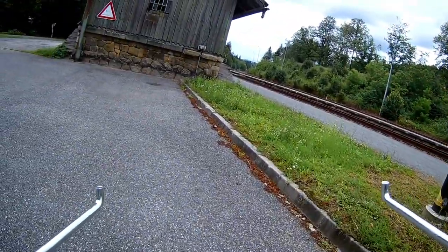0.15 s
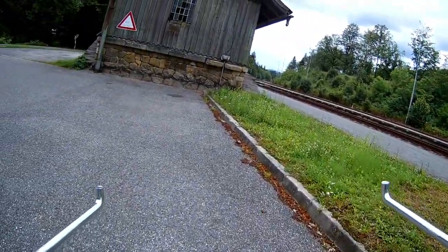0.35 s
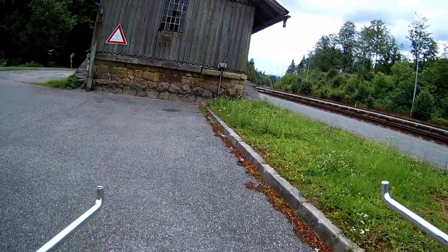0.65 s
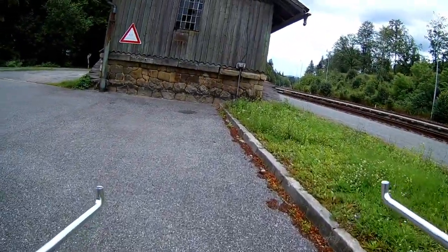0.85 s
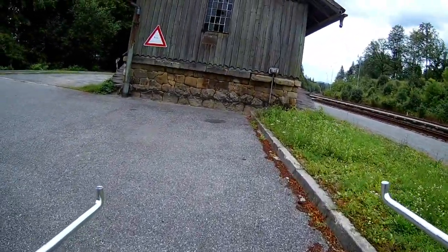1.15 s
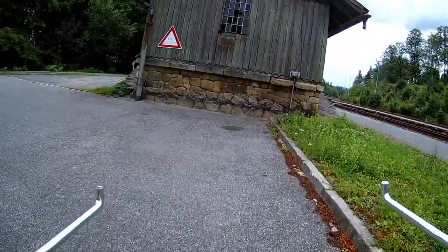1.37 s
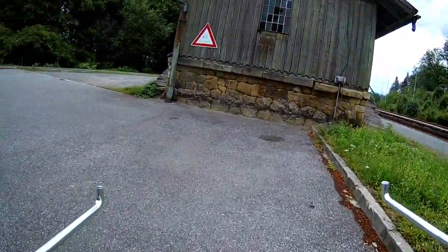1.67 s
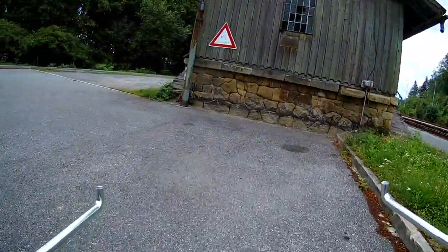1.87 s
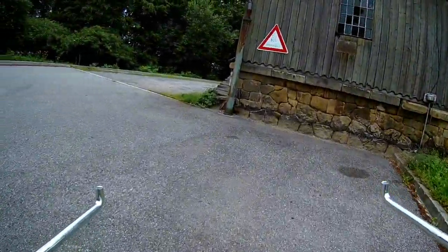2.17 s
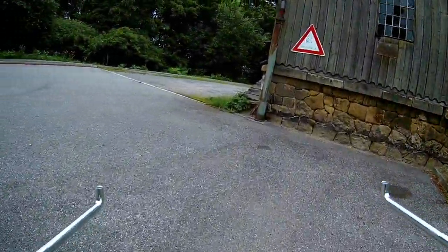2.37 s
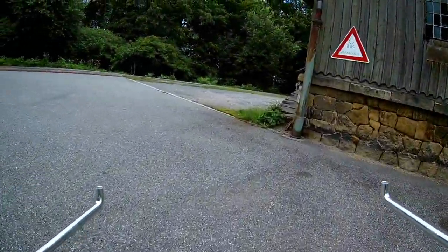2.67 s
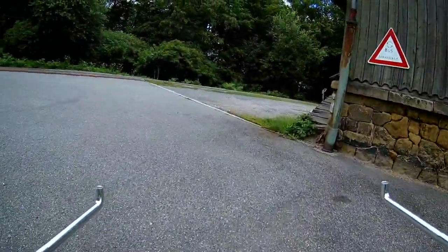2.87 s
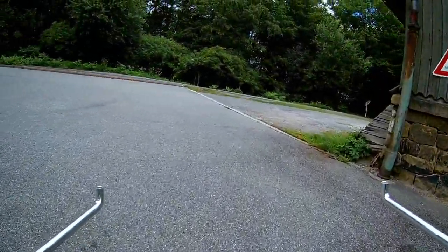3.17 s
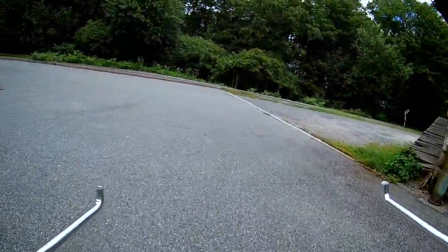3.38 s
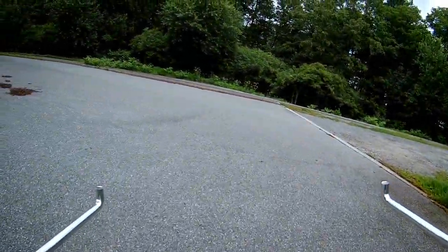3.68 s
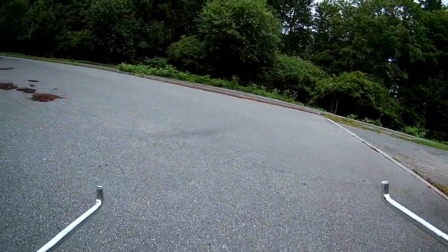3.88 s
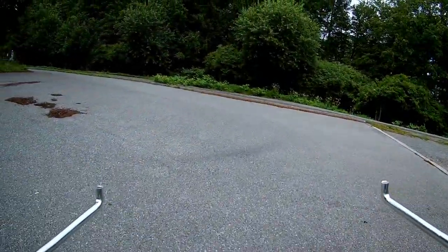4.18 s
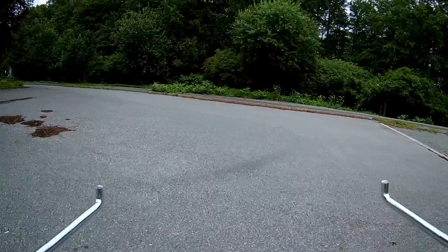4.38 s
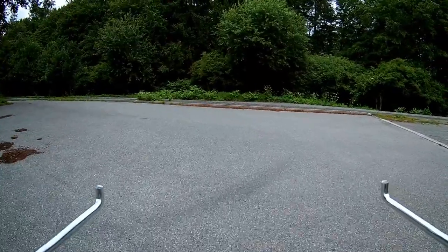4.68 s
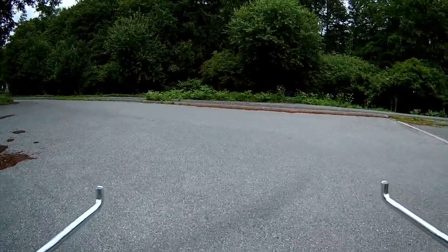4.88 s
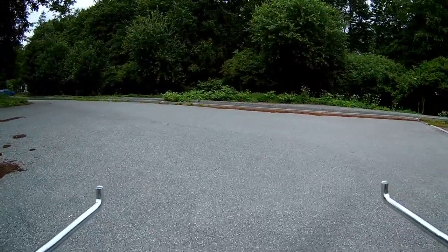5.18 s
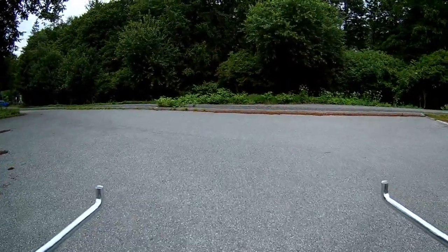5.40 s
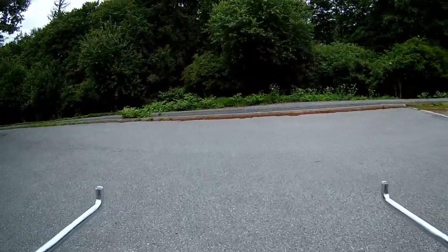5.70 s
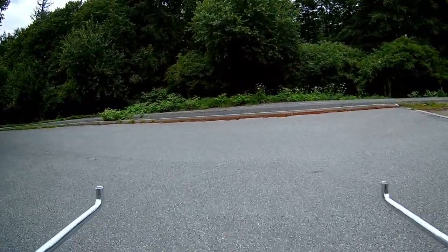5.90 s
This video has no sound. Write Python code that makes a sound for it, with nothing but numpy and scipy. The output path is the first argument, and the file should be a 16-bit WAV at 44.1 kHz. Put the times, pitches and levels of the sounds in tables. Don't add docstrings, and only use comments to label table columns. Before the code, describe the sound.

A microphone fixed to a bicycle frame near the fork picks up a ride across coarse open asphalt. Tyre boom, frame buzz and faint tread hiss run throughout. Loose fittings rattle around a hard knock at the start, then thin out. Grit snaps under the tyre, low wind thumps swell, and after about two seconds the chain ticks softly and regularly as pedalling settles.

```python
import sys
import numpy as np
from scipy import signal
from scipy.fft import rfft, irfft
from scipy.io import wavfile

SR = 44100
rng = np.random.default_rng(int(sys.argv[2]) if len(sys.argv) > 2 else 0)


def attenuation_scalar(level_db):
    decades = np.asarray(level_db, float) / 20
    return 10 ** decades


def file_out(sig):
    cols = np.atleast_2d(sig).T
    lim = np.clip(cols, -1, 1)
    pcm = np.round(lim * 32767).astype(np.int16)
    wavfile.write(sys.argv[1], SR, pcm)


N = 266805


def table(rows):
    return np.transpose(np.array(rows, float))


def control(rows):
    s, level_db = table(rows)
    return np.interp(np.arange(N) / SR, s, level_db)


def rms_one(x):
    return x / np.sqrt(np.mean(x ** 2) + 1e-20)


# f/Hz, width/Hz, level above the rest/dB
HOUSING_RESONANCES = [(439.5, 42, 5.5), (791, 98, 4), (1324, 150, 2.5), (1676, 350, 4), (2110, 110, 3),
                      (3360, 60, 1.5), (3860, 120, 0.5)]


def coloured(spectrum, white, ringing=False):
    hz = np.maximum(np.fft.rfftfreq(N, 1 / SR), 1)
    at_hz, level_db = table(spectrum)
    octaves_below = np.maximum(np.log2(at_hz[0] / hz), 0)
    octaves_above = np.maximum(np.log2(hz / at_hz[-1]), 0)
    curve_db = np.interp(np.log(hz), np.log(at_hz), level_db)
    gain = attenuation_scalar(curve_db - 44 * (octaves_below + octaves_above))
    if ringing:
        for centre_hz, width_hz, peak_db in HOUSING_RESONANCES:
            gain = gain * attenuation_scalar(peak_db / (1 + (2 * (hz - centre_hz) / width_hz) ** 2))
    return rms_one(irfft(rfft(white) * gain, N))


def drift(rate_hz):
    hop = 40
    settling = 2000
    r = np.exp(-2 * hop * np.pi * rate_hz / SR)
    white = rng.standard_normal(N // hop + settling + 2)
    slow = signal.lfilter([1], [1, -2 * r, r * r], white)[settling:]
    return np.interp(np.arange(N) / hop, np.arange(len(slow)), rms_one(slow))


def gritty(grains_per_s, spread_db, share):
    even = rng.standard_normal(N)
    born = rng.random(N) < grains_per_s / SR
    size = np.minimum(rng.exponential(1, N), 4)
    stones = born * attenuation_scalar(spread_db * size) * np.sign(even)
    return even + share * rms_one(stones)


# t/s, level/dB
GUSTS = [(0.0, -54), (0.27, -52.5), (0.4, -58), (0.94, -51), (1.45, -39.5), (1.62, -45), (1.77, -35.5),
         (1.95, -31), (2.09, -48), (2.21, -38), (2.35, -48), (2.6, -38), (2.75, -46), (3.0, -37.5),
         (3.55, -39), (4.3, -47.5), (5.4, -47), (5.75, -36.5)]
# f/Hz, level per Hz/dB
SWAY_SPECTRUM = [(11, -33), (18, -17.5), (38, 5), (70, -7.5), (90, -9), (120, -20), (200, -120)]


def wind_and_sway(boom_swell_db):
    level_db = control(GUSTS) - 1.3 + 0.05 * boom_swell_db
    return attenuation_scalar(level_db) * coloured(SWAY_SPECTRUM, rng.standard_normal(N))


# t/s, level/dB
BOOM_CURVE = [(0.0, -43.5), (0.45, -46), (0.83, -40.5), (0.94, -44), (1.55, -39), (1.77, -35), (1.95, -37),
              (2.07, -42), (2.13, -35), (2.4, -39), (2.61, -35), (2.8, -37), (4.11, -39), (4.5, -37.5),
              (4.58, -44), (4.75, -40.5), (5.68, -37.5), (5.8, -36.5)]
# f/Hz, level per Hz/dB
BOOM_SPECTRUM = [(41, -32), (70, -10.5), (97, -1), (113, 3.5), (145, -7.5), (214, -5.5), (253, -13),
                 (320, -19), (420, -47), (700, -120)]


def tyre_boom(boom_db):
    level_db = boom_db + 0.28 + 0.6 * drift(5.9)
    return attenuation_scalar(level_db) * coloured(BOOM_SPECTRUM, rng.standard_normal(N))


# t/s, level/dB
PACE_CURVE = [
    (0.0, -53.5),
    (0.22, -52),
    (1.14, -51),
    (1.65, -49),
    (3.69, -48.5),
    (4.87, -50.5),
    (5.56, -48.5),
    (6.05, -51),
]
# f/Hz, level per Hz/dB
BUZZ_SPECTRUM = [(160, -27.5), (270, -2), (371, -6.5), (654, -8), (781, -8.5), (1260, -13.5), (1930, -24),
                 (2110, -26), (2500, -36.5), (3250, -66), (5500, -120)]


def frame_buzz(boom_swell_db, unevenness):
    level_db = control(PACE_CURVE) - 0.07 + 0.13 * boom_swell_db + unevenness
    road = gritty(grains_per_s=300, spread_db=3.1, share=0.47)
    return attenuation_scalar(level_db) * coloured(BUZZ_SPECTRUM, road, ringing=True)


# t/s, level/dB
GRIT_CURVE = [
    (0, -73),
    (1.0, -73.5),
    (1.5, -71),
    (2.4, -72.5),
    (2.8, -70.5),
    (3.4, -70.5),
    (3.9, -72.5),
    (4.7, -75.5),
    (6.05, -75),
]
# f/Hz, level per Hz/dB
HISS_SPECTRUM = [(1350, -27), (2300, -2), (2670, -3.5), (3110, -3), (3810, -3), (4140, -4.5), (5890, -14.5),
                 (7500, -30.5), (9750, -55), (16500, -120)]


def tread_hiss(unevenness):
    level_db = control(GRIT_CURVE) - 0.13 + 1.3 * unevenness
    road = gritty(grains_per_s=400, spread_db=4.3, share=0.67)
    return attenuation_scalar(level_db) * coloured(HISS_SPECTRUM, road, ringing=True)


def rolling():
    boom_db = control(BOOM_CURVE)
    boom_swell_db = boom_db - boom_db.mean()
    unevenness = drift(21)
    low = wind_and_sway(boom_swell_db) + tyre_boom(boom_db)
    return low + frame_buzz(boom_swell_db, unevenness) + tread_hiss(unevenness)


def struck(times, ring_db, modes, contact_s, detune, scatter_db):
    hz, mode_db, t60, ring = table(modes)[:, :, None]
    t = np.arange(2400) / SR
    member = np.round(ring.T) == np.arange(ring_db.shape[1])[:, None]
    chance = rng.standard_normal((len(times), 2, len(hz), 1))
    push = (t / contact_s) ** 2 * np.exp(-t / contact_s)
    chatter = rng.standard_normal((len(times), 1, len(t))) * push
    spans_hz = [(0.53 * hz[own].min(), 1.186 * hz[own].max()) for own in member]
    padding = [signal.butter(3, span, "band", fs=SR, output="sos") for span in spans_hz]
    out = np.zeros(N + len(t))
    for s, level_db, (pitch, size), force in zip(times, ring_db, chance, chatter):
        tones = attenuation_scalar(-60 * t / t60) * np.sin(2 * np.pi * hz * (1 + detune * pitch) * t)
        tones = signal.fftconvolve(tones, force, axes=1)[:, :len(t)]
        tones *= attenuation_scalar(mode_db + scatter_db * size) / np.abs(tones).max(axis=1, keepdims=True)
        rings = np.array([signal.sosfilt(pad, one) for pad, one in zip(padding, member @ tones)])
        start = max(round((s - 1.8 * contact_s) * SR), 0)
        out[start:start + len(t)] += (attenuation_scalar(level_db) / np.abs(rings).max(axis=1)) @ rings
    return out[:N]


# f/Hz, level/dB, t60/s, ring
MOUNT_MODES = [(774, 6, 0.023, 0), (851, -10.5, 0.05, 0), (329, -3.5, 0.027, 1), (431, -0.5, 0.025, 1.5),
               (594, -3.5, 0.016, 2), (656, 7, 0.042, 2), (1277, 1, 0.027, 3), (1360, -11.5, 0.034, 5),
               (1560, -7, .012, 4.5), (1710, 1, .025, 4.5), (2044, 3, 0.04, 4), (2165, -6, 0.031, 4),
               (2640, -17, 0.0072, 3), (3010, -10.5, 0.02, 3.5), (3400, -17, .015, 5.5),
               (3833, -10.5, 0.03, 3.5), (4500, -24, .008, 5.5), (5200, -24, .015, 4.5)]


def knocks(rows, shape_db, clamp_sharpens, contact_s):
    s, level_db, hollow_db, sharp_db = table(rows)
    tilt_db = np.transpose([0 * s, hollow_db, hollow_db, clamp_sharpens * sharp_db, sharp_db])
    rings_db = tilt_db + level_db[:, None] + shape_db
    return struck(s, rings_db, MOUNT_MODES, contact_s, detune=0.02, scatter_db=2.5)


# t/s, clamp ring level/dB, hollowness/dB, sharpness/dB
RATTLE_BLOWS = [(0.023, -40, -17, 0), (0.082, -39.5, -11, 1.5), (0.121, -37, -3, -4), (0.13, -38, -8, -5),
                (0.14, -44.5, -7, 1), (0.163, -39.5, -11, 0.5), (0.208, -41, -13, 1), (0.221, -51, -7, 5),
                (0.266, -44.5, -10, -0.5), (0.283, -51, -10, 2), (0.59, -46.5, -9, -3.5),
                (1.027, -44.5, 1, -13), (2.689, -48, -3, -8), (2.782, -48.5, -6, 6), (3.33, -41, -4, -8),
                (3.406, -37.5, -12, -16), (3.619, -46, 1, -6), (3.722, -40, 7, -7), (3.824, -41.5, -12, 3)]
RATTLE_SHAPE = [
    0,
    0,
    -6,
    4,
    -5,
]


def rattles():
    return knocks(RATTLE_BLOWS, RATTLE_SHAPE, clamp_sharpens=0.05, contact_s=0.00141)


# t/s, body ring level/dB, hollowness/dB, sharpness/dB
BUMP_BLOWS = [(0.112, -23.5, -2, 0), (0.396, -38, -8, 7), (0.474, -41.5, 1, -5), (0.569, -47, -2, 0),
              (0.696, -50, -1, 5), (0.744, -40.5, 8.5, -3), (1.307, -48, -4, -1), (1.319, -32.5, -3.5, -7),
              (1.372, -40.5, 3, -2), (1.591, -43, 3, 7), (1.665, -43.5, 2, 5), (1.709, -39.5, 2, 3.5),
              (1.754, -41.5, 0, 4), (1.904, -40, 4, 5.5), (1.926, -38.5, -1, 0), (1.953, -44, -5, 2),
              (2.951, -44, 0, -2), (2.991, -43, -4, 0), (3.091, -43, 2, 1), (3.16, -40, 0, -5),
              (3.255, -36, -14, 1.5), (3.901, -40.5, 2, 3), (4.143, -46, -1, -1), (4.341, -43, 5, -9),
              (4.68, -51, 5, -2), (4.781, -26.5, -4.5, -11.5), (5.344, -48, 4, -7), (5.741, -36.5, 6.5, -7)]
BUMP_SHAPE = [
    4,
    -0.2,
    -5.5,
    -7,
    -11,
]


def bump_knocks():
    return knocks(BUMP_BLOWS, BUMP_SHAPE, clamp_sharpens=0.62, contact_s=0.000792)


# t/s, peak level/dB
GRIT_SNAPS = [(0.5444, -60), (0.5836, -54), (1.224, -49), (1.3504, -59), (1.3728, -56), (1.444, -58),
              (1.5244, -56), (1.836, -45), (1.8744, -55), (1.9664, -48), (2.595, -52), (2.681, -57),
              (2.7262, -50), (2.7823, -49), (2.925, -47), (3.16, -52), (3.2144, -56), (3.253, -55),
              (3.279, -42.5), (3.4047, -56), (3.574, -49), (3.7264, -51), (3.818, -54), (3.8267, -49),
              (4.1694, -59), (4.3444, -62), (4.786, -52), (5.7364, -64), (5.7544, -60), (5.8794, -68)]


def grit():
    t = np.arange(400) / SR
    dull = signal.butter(4, [1700, 5200], "band", fs=SR, output="sos")
    bursts = rng.standard_normal((len(GRIT_SNAPS), len(t))) * np.exp(-t / 0.0009)
    cracks = signal.sosfilt(dull, bursts)
    out = np.zeros(N + len(t))
    for (s, peak_db), crack in zip(GRIT_SNAPS, cracks):
        start = round(s * SR)
        out[start:start + len(t)] += attenuation_scalar(peak_db - 0.3) * crack / np.abs(crack).max()
    return out[:N]


# f/Hz, level/dB, t60/s, ring (0 link, 1 plate, 2 tooth)
CHAIN_MODES = [(2090, 1.5, 0.05, 0), (2140, -1.5, 0.068, 0), (2690, -10, .01, 1), (3096, -0.5, 0.033, 1),
               (3235, 0, 0.04, 1), (3420, -0.5, 0.049, 1), (3837, -2.5, 0.038, 2), (3884, -1, .04, 2),
               (4430, -4.5, 0.016, 2), (4700, -7, .01, 2), (5100, -16, 0.016, 2), (6030, -12, .008, 2)]
# t/s, link ring level/dB
SLACK_TICKS = [(1.815, -58), (1.853, -54), (2.037, -50), (2.078, -56), (2.123, -50.5), (2.177, -52),
               (2.236, -49), (2.312, -42.5), (2.394, -47), (2.462, -51), (2.499, -61)]
# t/s, teeth passed, chain pull as link ring level/dB
PEDALLING = [(2.566, 1, -49), (2.686, 3, -53), (2.752, 4, -47), (2.993, 8, -52), (3.24, 12, -48),
             (3.435, 15, -55), (3.684, 19, -50), (3.923, 23, -47), (3.996, 24, -47), (4.187, 27, -51.5),
             (4.446, 31, -55), (4.579, 33, -51), (4.707, 35, -53), (5.096, 41, -49), (5.293, 44, -52),
             (5.66, 50, -54), (5.854, 53, -48.5), (6.042, 56, -50)]


def chain():
    at_s, teeth, pull_db = table(PEDALLING)
    early_s, early_db = table(SLACK_TICKS)
    tooth = np.arange(1, 57)
    s = np.append(early_s, np.interp(tooth, teeth, at_s))
    link_db = np.append(early_db, np.interp(tooth, teeth, pull_db))
    upper_db = 0.17 * (link_db - link_db.mean())
    rings_db = np.transpose([link_db - 0.5, upper_db - 58, upper_db - 59.5])
    rings_db = rings_db + 2.45 * rng.standard_normal(rings_db.shape)
    link_modes = CHAIN_MODES[:2]
    sprocket_modes = [(hz, db, t60, ring - 1) for hz, db, t60, ring in CHAIN_MODES[2:]]
    link_lag_s, roller_lead_s = 0.001177, 0.002
    link = struck(s + link_lag_s, rings_db[:, :1], link_modes,
                  contact_s=0.0018, detune=0.0083, scatter_db=5)
    sprocket = struck(s - roller_lead_s, rings_db[:, 1:], sprocket_modes,
                      contact_s=0.0014, detune=0.0078, scatter_db=2.5)
    return link + sprocket


def scene():
    return (rolling() + rattles() + bump_knocks() + grit() + chain())[None]


# f/Hz, level per Hz/dB
SELF_NOISE_SPECTRUM = [(2940, -21), (5000, -7.5), (5970, -5), (7810, -9.5), (11900, -9), (15200, -7),
                       (15800, -11)]


def self_noise():
    return attenuation_scalar(-79.5) * coloured(SELF_NOISE_SPECTRUM, rng.standard_normal(N))


def band_limit(x):
    return signal.sosfilt(signal.butter(12, 15900, fs=SR, output="sos"), x)


def record(dry):
    mix = dry + self_noise()
    return band_limit(mix)


dry = scene()
out = record(dry)
file_out(out)
```